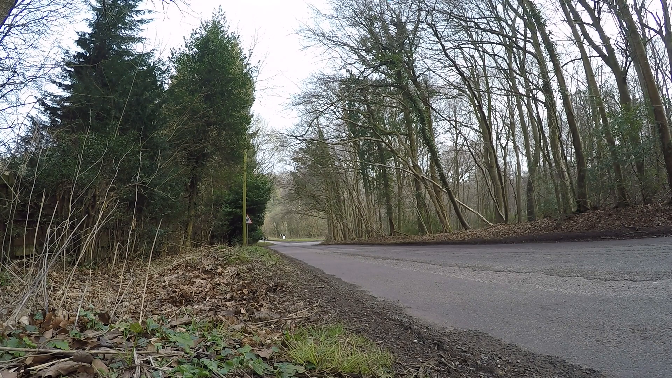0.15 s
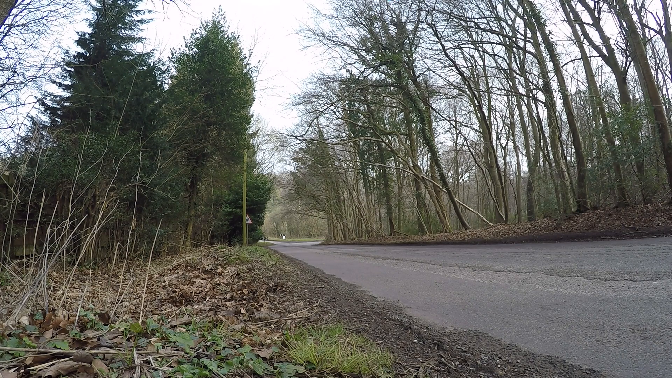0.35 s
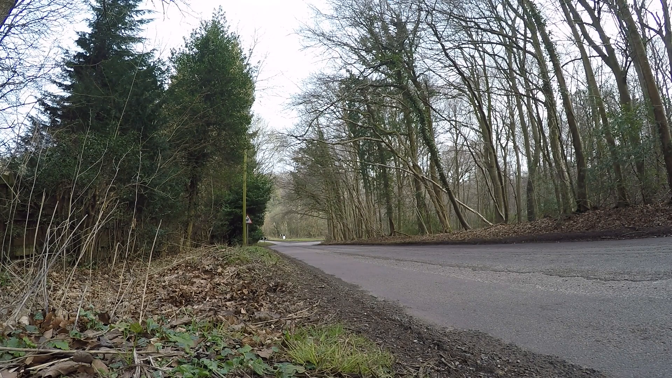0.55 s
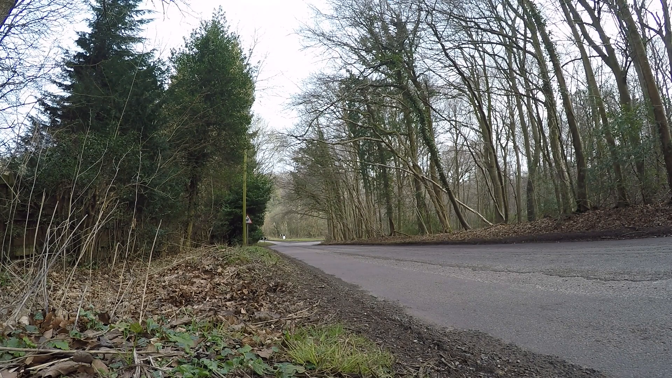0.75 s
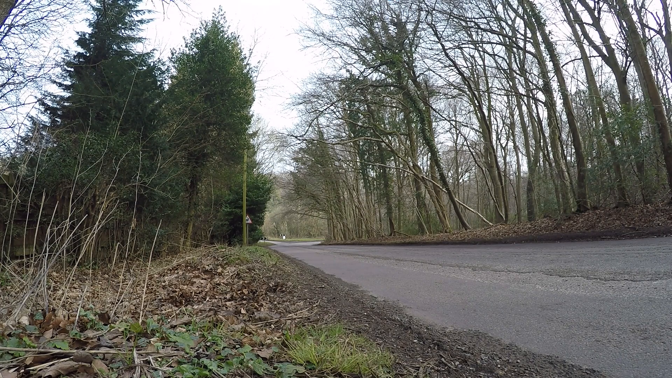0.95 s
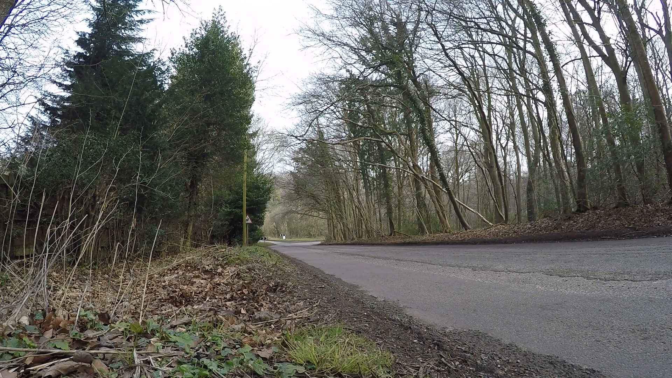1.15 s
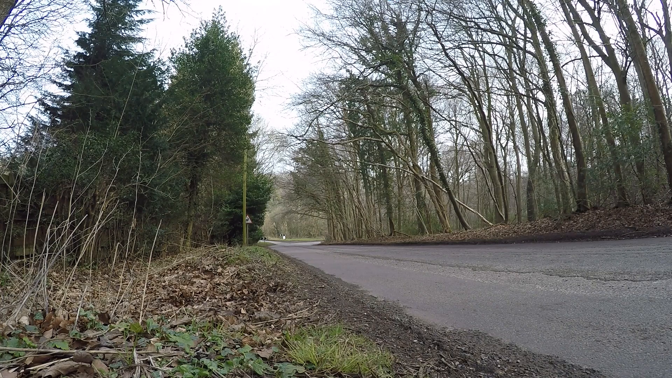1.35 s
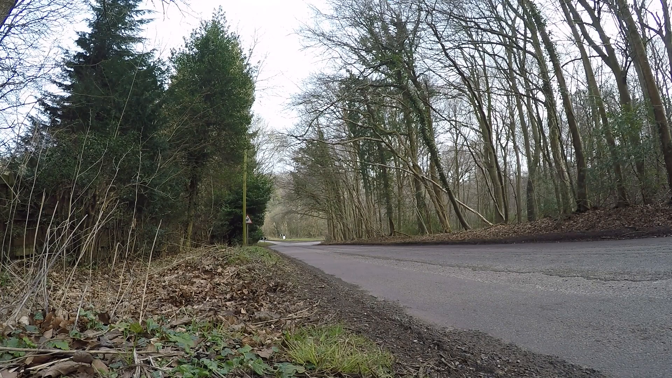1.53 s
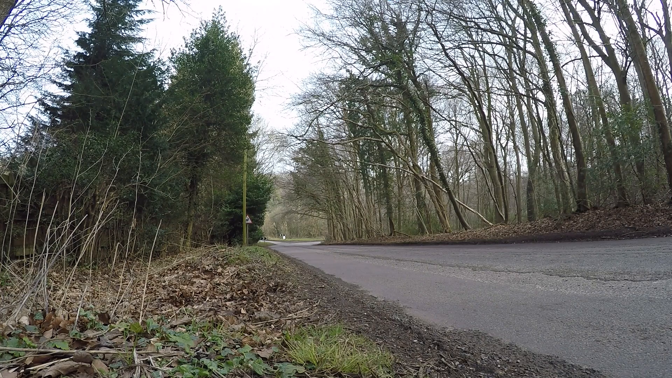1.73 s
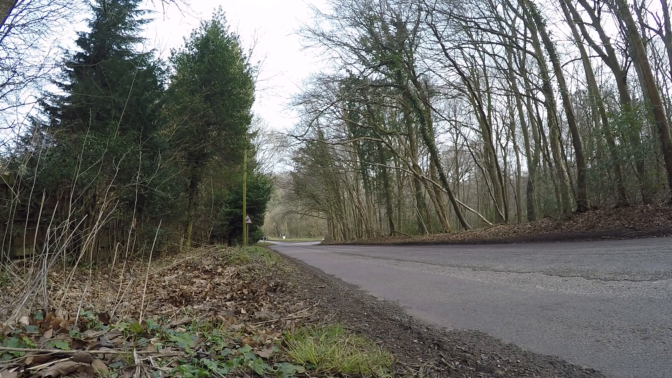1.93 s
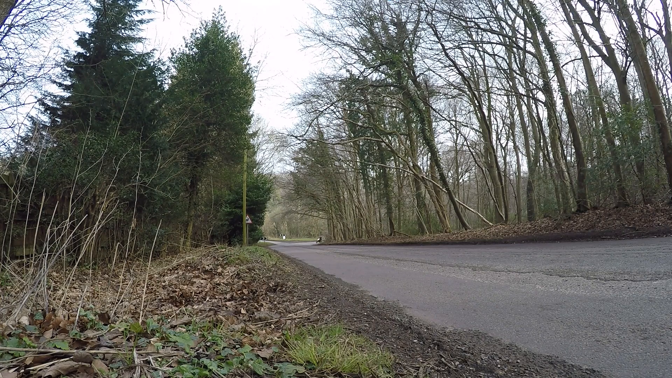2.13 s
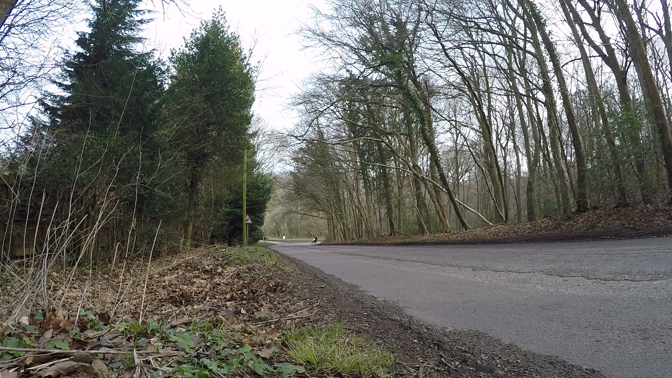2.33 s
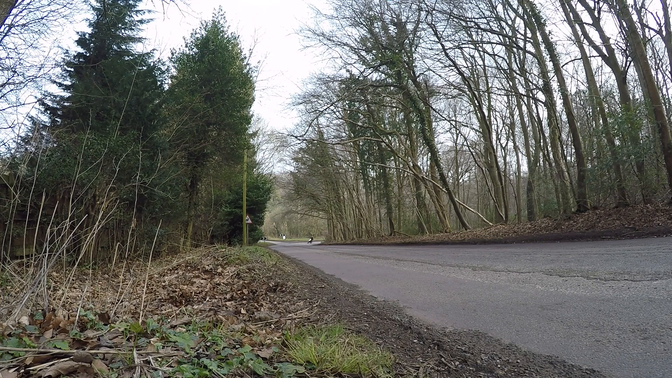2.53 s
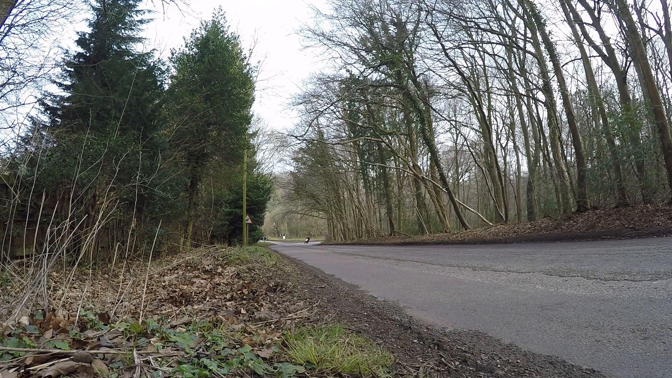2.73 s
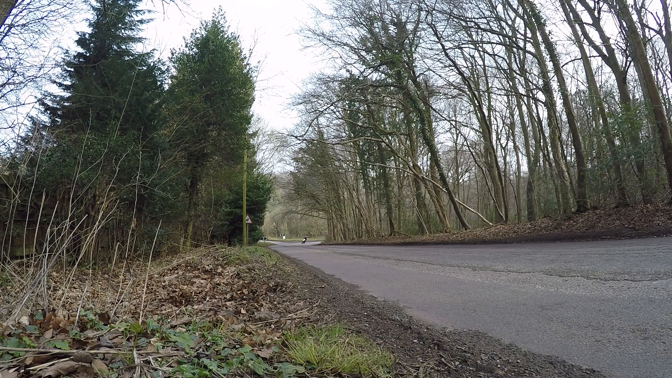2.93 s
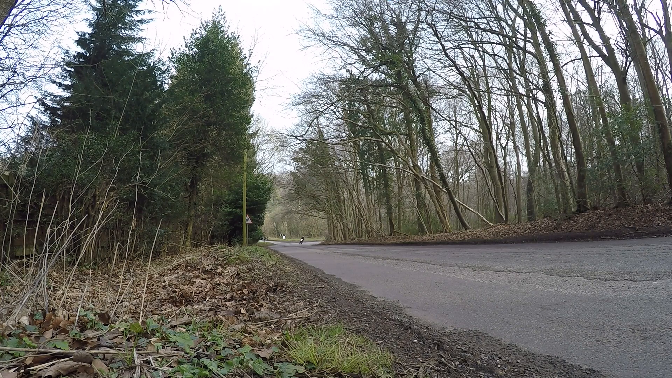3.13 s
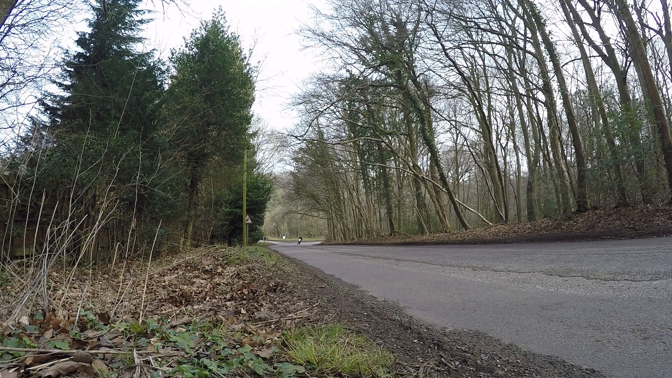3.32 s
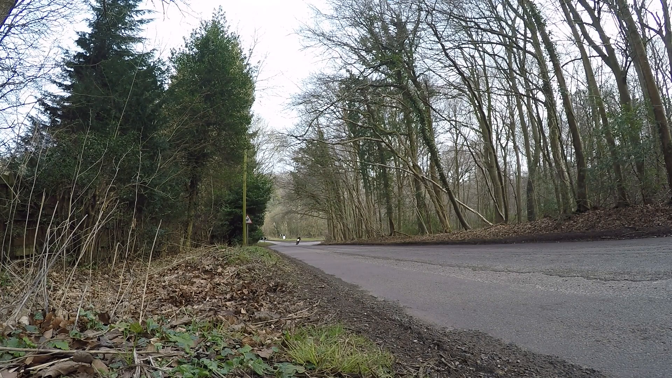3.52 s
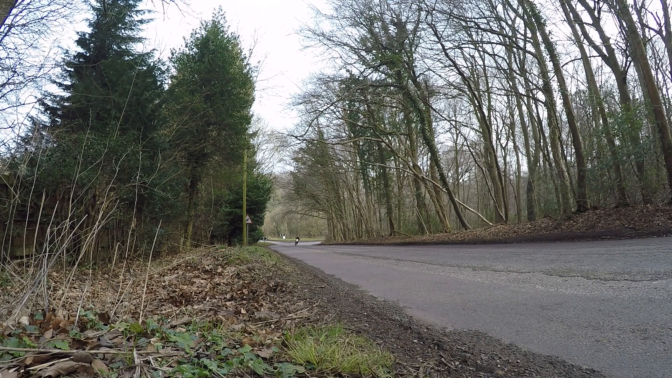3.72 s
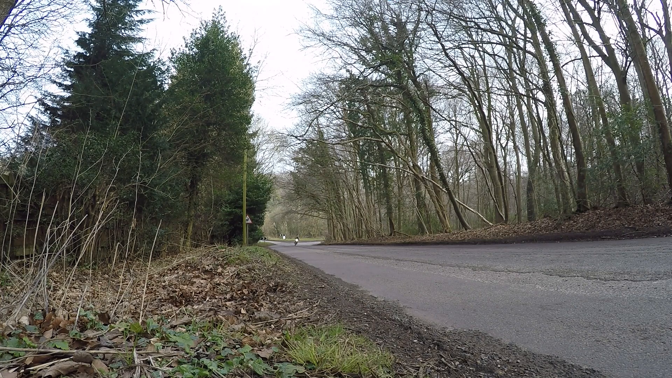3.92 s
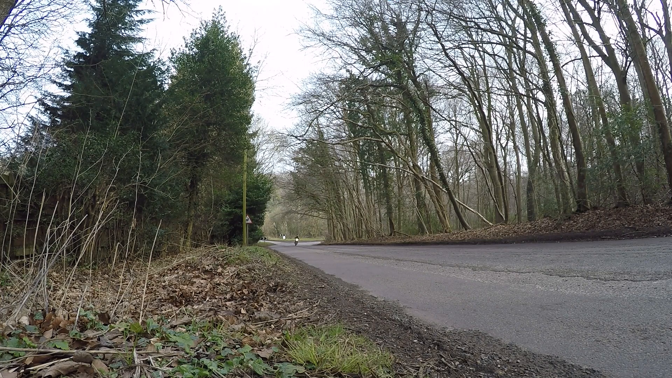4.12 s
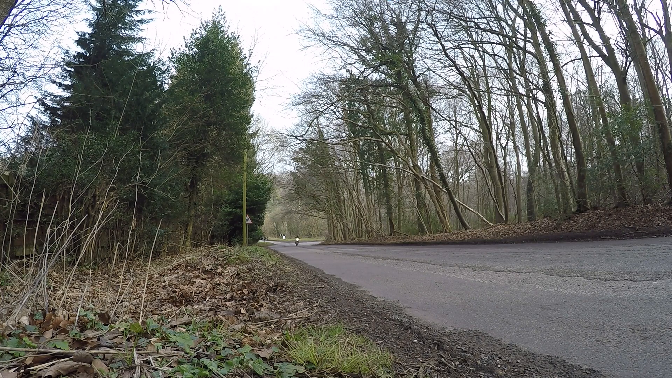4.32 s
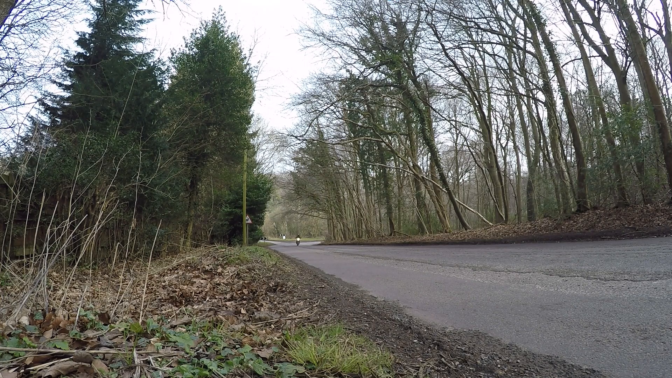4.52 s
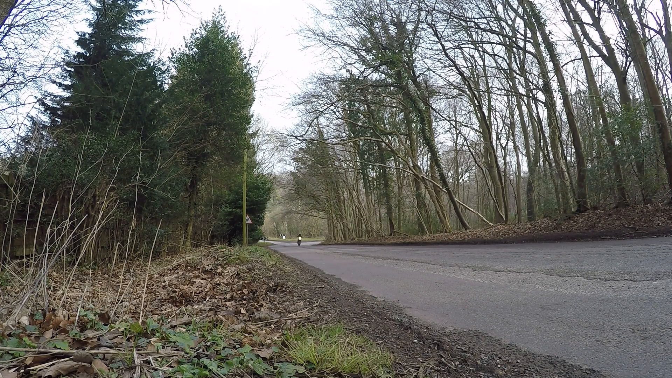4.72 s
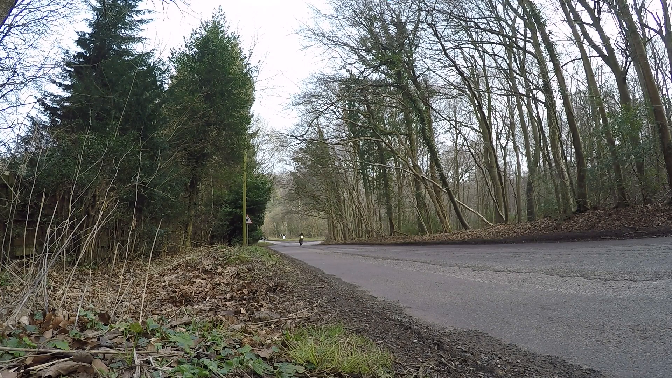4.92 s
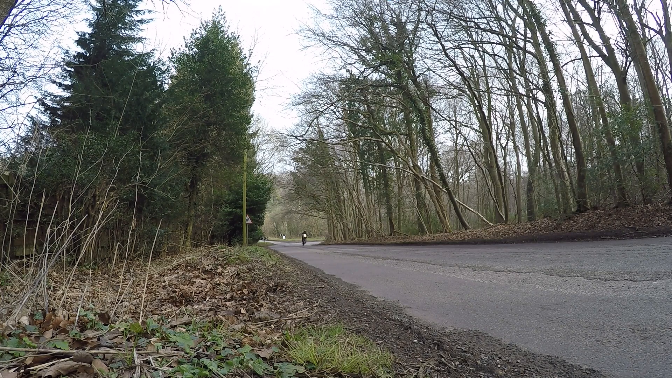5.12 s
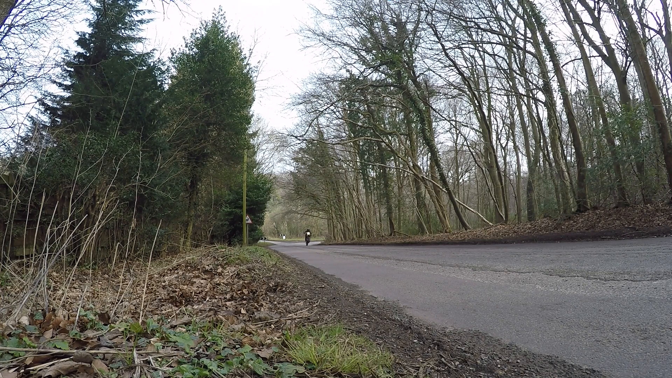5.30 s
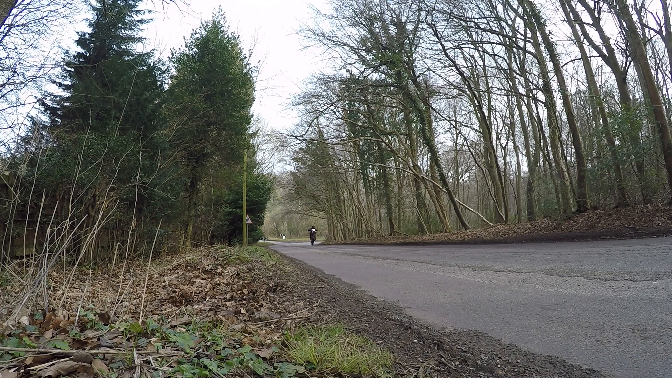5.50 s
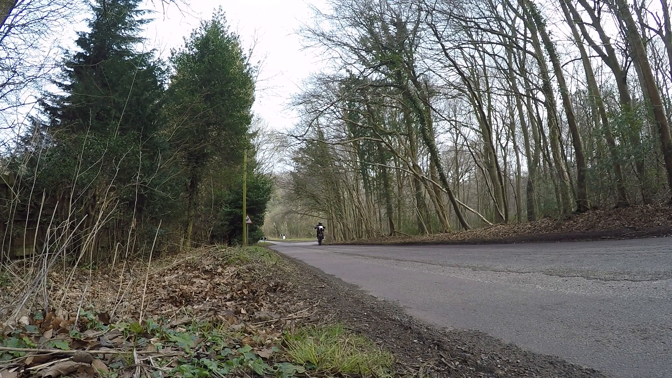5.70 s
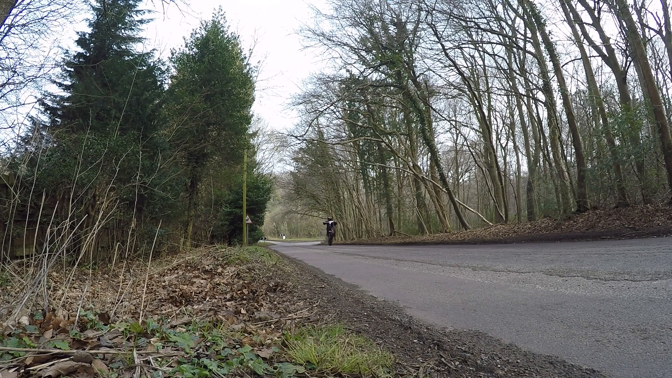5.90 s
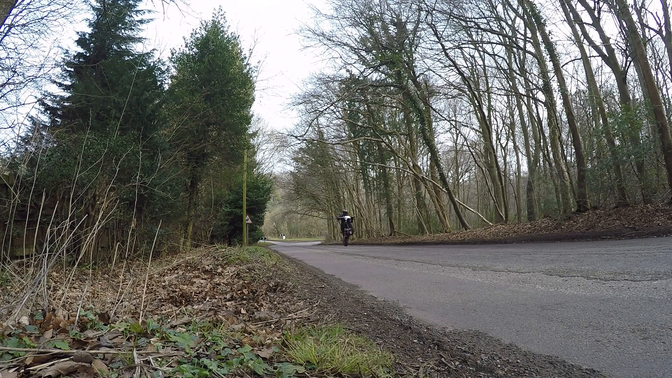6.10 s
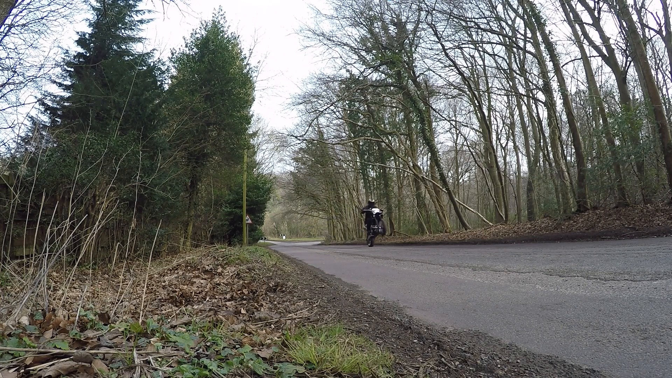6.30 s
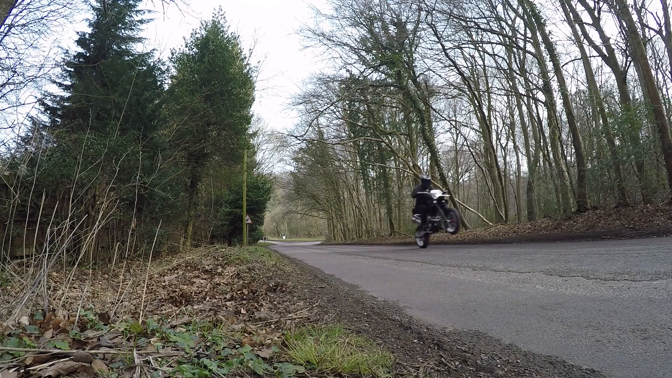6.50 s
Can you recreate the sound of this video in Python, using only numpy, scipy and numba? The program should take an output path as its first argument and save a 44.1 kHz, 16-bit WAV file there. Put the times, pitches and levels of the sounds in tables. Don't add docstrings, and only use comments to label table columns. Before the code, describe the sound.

A quiet wooded roadside with faint air, soft preamp hiss and very weak, buzzing electronic whine. From 0 s a far single-cylinder motorcycle burbles low and dull, slowing and dropping in pitch; a thin brake squeal near 3.5 kHz peaks around 0.9 s and fades by 1.2 s. At about 2.2 s comes a quick throttle blip. From 2.6 s distinct hollow thumps emerge, with one weak misfire near 2.7 s, and the engine pulls harder. By 4 s it is a barking exhaust with gas roar and hiss, rising in pitch as it approaches, echoing off banks and trunks. The throttle eases briefly around 4.6, 5.7 and 6.15 s, each followed by a stronger surge. From 6.2 s the front wheel lifts and close, raspy, crackling firings overload the microphone, ending abruptly at about 6.5 s, still approaching.

```python
import sys
import numpy as np
from scipy import signal
from scipy.fft import rfft, irfft, next_fast_len
from scipy.io import wavfile
from scipy.ndimage import uniform_filter1d, map_coordinates
from numba import njit

SR = 44100
rng = np.random.default_rng(int(sys.argv[2]) if len(sys.argv) > 2 else 0)


def to_wav(s):
    ch = np.atleast_2d(s).T
    pcm = np.round(np.clip(ch, -1, 1) * 32767)
    wavfile.write(sys.argv[1], SR, pcm.astype(np.int16))


def boost(x):
    u = np.asarray(x, float) / 20
    return 10 ** u


N = 288855
TIME = np.arange(N) / SR


def level(x, db):
    return x * boost(db) / np.sqrt(np.mean(x ** 2))


def even(x):
    return x / np.sqrt(uniform_filter1d(x ** 2, SR // 4) + 1e-18)


def curves(table):
    s, *columns = np.transpose(table)
    return [np.interp(TIME, s, c) for c in columns]


def swell(at, rise, hold, fall):
    return np.interp(TIME, at + np.cumsum([0, rise, hold, fall]), [0, 1, 1, 0])


def bump(s, half):
    return np.exp(-((TIME - s) / half) ** 2)


def walk(rate):
    k = int(SR / rate)
    steps = np.repeat(rng.standard_normal(N // k + 1), k)
    return level(uniform_filter1d(uniform_filter1d(steps, k), k)[:N], 0)


@njit
def svf(x, hz, width):
    band, high, b, l = np.empty(len(x)), np.empty(len(x)), 0., 0.
    for i in range(len(x)):
        g, k = np.tan(np.pi * hz[i] / SR), width[i] / hz[i]
        v = (b + g * (x[i] - l)) / (1 + g * (g + k))
        band[i], high[i] = k * v, x[i] - k * v - l - g * v
        b, l = 2 * v - b, l + 2 * g * v
    return band, high


def low_pass(x, hz):
    for _ in range(2):
        x = x - sum(svf(x, hz, 1.93 * hz))
    return x


def resonate(x, modes):
    one = np.ones(N)
    out = 0
    for k, (hz, width, db) in enumerate(modes):
        out = out + (-1) ** k * boost(db) * svf(x, hz * one, width * one)[0]
    return out


def colour(x, points):
    hz, db = np.transpose(points)
    f = np.fft.rfftfreq(N, 1 / SR) + 1
    return irfft(rfft(x) * boost(np.interp(np.log(f), np.log(hz), db)), N)


def woods():
    # frequency in Hz, level in dB per Hz.
    air_spectrum = [(150, -2.5), (260, -6), (400, -14.5), (1400, -17), (2500, -21.5), (3700, -22),
                    (5000, -35.5), (6300, -48), (9000, -69), (13000, -54), (15500, -53)]
    return level(colour(rng.standard_normal(N), air_spectrum), -55.5) * boost(1.0 * walk(1.0))


def camera_whine():
    # frequency in Hz, width in Hz, level in dB, unsteadiness in dB.
    whines = [
        (7100, 600, -76, 3),
        (8360, 60, -73, 1),
        (13600, 800, -79, 1.2),
    ]
    frames = (60 * TIME) % 1 < .45
    out = 0
    for hz, width, db, sway_db in whines:
        tone = level(resonate(rng.standard_normal(N), [(hz, width, 0)]), db)
        out = out + tone * boost(sway_db * walk(4.5))
    return frames * out


def brake_squeal():
    # time in seconds, level in dB.
    squeal_db = [
        (0, -89),
        (.3, -71),
        (.9, -65),
        (1.2, -83),
    ]
    return boost(curves(squeal_db)[0]) * level(resonate(rng.standard_normal(N), [(3570, 70, 0)]), 0)


def controls():
    # time in seconds, firing rate in Hz.
    rate = [(0, 45.2), (.33, 42.26), (.82, 40.98), (1.35, 36.6), (1.7, 35.32), (2.15, 31.88), (2.64, 31.63),
            (3.47, 34.04), (3.78, 37.1), (3.87, 38.77), (4.58, 44.65), (4.74, 50.91), (5.42, 61.83),
            (5.64, 65.35), (5.75, 64.2), (5.93, 68.44), (6.26, 66.35), (6.55, 72)]
    # time in seconds, gas flow in dB, strength of the pressure pulse in dB.
    drive = [(0, -23.5, -32.5), (.42, -32, -42), (1.45, -40, -43.5), (1.9, -38, -28.5), (2.2, -39, -30.5),
             (2.42, -36.5, -28.5), (2.58, -32, -15), (2.85, -29.5, -10.5), (3.4, -21, -5),
             (3.72, -21.5, -6), (3.92, -10, -1.5), (4.07, -7.5, -2.5), (4.21, -9.5, -3.5), (4.36, -4, -3),
             (4.78, -0.5, 0), (5.4, -0.54, 1.5), (5.9, 0.5, 5.5), (6.55, 0.5, 6.5)]
    # time of least gas in seconds, closing in seconds, reopening in seconds, change in dB,
    # lead of the pulses in seconds.
    lifts = [
        (4.64, 0.26, 0.062, -5.5, 0.04),
        (5.67, .14, 0.13, -9, 0.077),
        (6.148, 0.25, 0.1, -14, 0.089),
    ]
    layers = {"boom": (-14, 0.3152, -0.06, 0.5335, -48), "ring": (-24, -0.13, 0.3, 0.34, -70),
              "bark": (-19, 0.1, 0.92, 0.0359, -83), "roar": (-19, 1.2, -0.14, 0.0638, -81.5),
              "rasp": (-20, .5, 0.27, .5, -74), "hiss": (-21.5, 0.43, 0, 1.15, -82),
              "sizzle": (-29, 0.8, 0.38, 1.19, -70)}
    shadows = {"ring": (1.67, 0.17, -10.5), "rasp": (2.75, .12, -7)}
    # time in seconds, half length in seconds, change in dB.
    ring_fades = [
        (3.0, .3, 4),
        (3.6, .2, -5),
        (4.3, 0.13, -13),
    ]
    # time in seconds, level in dB.
    aim = [(2.3, -1.5), (3.7, -9), (4.2, 7), (4.35, 8), (4.6, -4), (4.7, -1), (6.0, -5), (6.25, -6),
           (6.46, 2.5)]

    def lift_db(early):
        return sum(db * swell(s - early * lead - shut, shut, 0, reopen) for s, shut, reopen, db, lead in lifts)

    blip_s = 2.16
    blip = swell(blip_s, 0.107, .08, 0.234)
    gas_db, pulse_db = curves(drive)
    gas_db = gas_db + lift_db(0) + 8 * blip
    pulse_db = pulse_db + 0.97 * lift_db(0.72) + 13.5 * swell(blip_s, 0.045, 0.022, 0.07)
    pulse_db = pulse_db - 17 * bump(2.735, 0.023)

    speed_m_s, passes_s, verge_m = 21.2, 7.008, 4.4
    distance_m = np.hypot(speed_m_s * (passes_s - TIME), verge_m)
    near_db = -20 * np.log10(distance_m / 10)
    gain = {}
    for name, (db, gas_share, pulse_share, near_share, least_db) in layers.items():
        follow_db = db + gas_share * gas_db + pulse_share * pulse_db + near_share * near_db
        gain[name] = np.hypot(boost(follow_db), boost(least_db))

    gain["boom"] = gain["boom"] * boost(2 * blip)
    for name, (s, clearing, db) in shadows.items():
        gain[name] = gain[name] * boost(db * np.clip((s + clearing - TIME) / clearing, 0, 1))
    gain["ring"] = gain["ring"] * boost(sum(db * bump(s, half) for s, half, db in ring_fades))
    for name, share in dict(hiss=0.53, sizzle=0.94).items():
        gain[name] = gain[name] * boost(share * curves(aim)[0])
    wheelie = np.clip((TIME - 6.13) / .05, 0, 1)
    gain["rasp"] = gain["rasp"] * boost(2.5 * wheelie)
    gain["roar"] = gain["roar"] * boost(-1 * wheelie)
    return curves(rate)[0] + 9.68 * blip, gain


def crank(hz):
    beats_s = [2.2103, 2.605, 2.7662, 3.162, 3.429, 3.684, 3.872, 4.048, 4.263, 4.488, 4.704, 6.147, 6.343,
               6.516]
    turns = np.cumsum(hz) / SR
    at_beats = np.interp(beats_s, TIME, turns)
    return turns - np.interp(TIME, beats_s, np.unwrap(at_beats % 1, period=1))


def firings(turns, late_s, size_db):
    at = np.flatnonzero(np.diff(np.floor(turns)) > 0)
    chance = rng.standard_normal((len(at), 2)).T
    pulses = np.zeros(N)
    at = np.clip(at + (late_s * SR * chance[0]).astype(int), 0, N - 1)
    pulses[at] = boost(size_db * chance[1])
    return pulses


def orders(turns, hz):
    orders_db = [-6, -0.14, -3, -5, -9.5]
    order_turns = [.48, .12, .78, .72, .66]
    # frequency in Hz, level in dB.
    header = [(35, 5), (60, 1.5), (85, 2), (108, -3.5), (128, 0), (155, 0.5), (200, -3.5), (270, 4.5)]
    # time in seconds, half length in seconds, change in dB.
    fades = [
        [(.6, .45, 4.5), (1.7, .3, -3), (3.5, .3, -4), (5.7, 0.46, -5), (6.1, 0.085, 7)],
        [(.8, 0.13, -0.5), (1.05, 0.096, -4), (2.9, 0.57, -7), (6.2, 0.11, 4.5), (6.46, 0.086, -20)],
        [(.4, 0.4, 7.5), (2.0, .3, -5), (4.5, 0.11, -14), (5.62, 0.063, -12), (6.05, 0.1, -18),
         (6.35, 0.092, 6)],
        [(.3, 0.3, -13), (.85, 0.12, -2), (1.8, 0.26, 6.5), (3.2, 0.24, 4), (4.4, 0.17, -19),
         (5.65, 0.095, -32)],
        [(.8, 1.0, -14), (3.1, .3, 11), (3.9, 0.52, -5), (5.1, 0.42, 0), (6.4, 0.16, 6.5)],
    ]
    header_hz, header_db = np.transpose(header)
    out = 0
    for k, db in enumerate(orders_db):
        order_hz = (k + 1) * hz
        db = db + np.interp(np.log(order_hz), np.log(header_hz), header_db) + 1.0 * walk(8.1)
        db = db + sum(fade_db * bump(s, half) for s, half, fade_db in fades[k])
        phase = 2 * np.pi * ((k + 1) * turns + order_turns[k])
        out = out + np.sqrt(2) * boost(db) * np.sin(phase)
    return out


def exhaust_boom(turns, hz, gain):
    # lag in seconds, level in dB.
    far_wall = [
        (.11, -10.5),
        (.29, -3),
    ]
    # time in seconds, share from 0 to 1.
    wall_share = [(0, .05), (4.3, .1), (5.3, .9), (6.55, .9)]
    boom = gain * orders(turns, hz)
    echo = 0
    for lag, db in far_wall:
        echo = echo + boost(db) * map_coordinates(boom, [(TIME - lag) * SR], order=1, mode="mirror")
    return boom + curves(wall_share)[0] * echo


def rumble(gain):
    return gain * boost(-7) * level(resonate(rng.standard_normal(N), [(43.6, 107, -1.5), (117, 49, 11)]), 0)


def over_ground(x, lag_cycles=.3):
    size = next_fast_len(N + SR)
    f = np.fft.rfftfreq(size, 1 / SR) + 30
    return irfft(rfft(x, size) * np.exp(-2j * np.pi * lag_cycles * np.log(f / 2000)), size)[:N]


def smeared_clicks(pulses, hz):
    clicks = svf(over_ground(pulses), 4.2 * hz, 5.0 * hz)[1]
    return svf(clicks[::-1].copy(), 4.2 * hz[::-1], 5.0 * hz[::-1])[1][::-1].copy()


def silencer_ring(clicks, hz, gain):
    # frequency in Hz, width in Hz, level in dB.
    chamber = [
        (162, 51, 4.5),
        (201.6, 38, -1.5),
    ]
    ring = gain * even(resonate(resonate(clicks, chamber), [(188, 150, 0)]))
    return ring * np.clip((51 - hz) / 6, .1, 1)


def banks(x):
    # lag far in ms, lag near in ms, level in dB.
    bank_echoes = [
        (3.64, 4.27, -7),
        (8.14, 6.34, -4.5),
        (13.79, 21.0, -12.5),
        (33.33, 27.0, -0.5),
    ]
    near = (TIME / TIME[-1]) ** 2
    out = x
    for far, close, db in bank_echoes:
        lag_ms = far + (close - far) * near + .5 * walk(4)
        out = out + boost(db) * near ** 0.74 * np.interp(TIME - lag_ms / 1000, TIME, x)
    return out


def pipe_bark(clicks, hz, gain):
    # frequency in Hz, width in Hz, level in dB.
    tail_pipe = [
        (294, 61, 6.5),
        (588, 700, 9),
        (900, 100, -29),
    ]
    # time in seconds, frequency in Hz.
    bark_top = [(0, 323), (2.2, 465), (2.8, 610), (3.8, 900), (6.55, 1010)]
    # time in seconds, frequency in Hz.
    ground_band = [(0, 263), (2.1, 290), (2.5, 335), (3.0, 335), (3.4, 312), (3.9, 330), (4.6, 440),
                   (5.7, 410), (6.55, 350)]
    ground_hz = curves(ground_band)[0]
    pipe = low_pass(resonate(clicks, tail_pipe), curves(bark_top)[0])
    pipe = banks(.7 * pipe + .7 * svf(pipe, ground_hz, .28 * ground_hz)[0])
    pipe = pipe - np.clip((50 - hz) / 8, .2, .85) * resonate(pipe, [(228, 30, 0)])
    return gain * even(pipe)


def gas_roar(shape, shock, air_hz):
    # frequency in Hz, width in Hz, level in dB.
    roar_modes = [
        (804, 324, -4.5),
        (1800, 1154, -1),
        (2870, 1950, -5),
    ]
    turbulence = shape ** .7 * rng.standard_normal(N) * boost(.6 * walk(14))
    return low_pass(resonate(.35 * shock + turbulence, roar_modes), air_hz)


def end_cap_rasp(shape, shock, gated):
    # frequency in Hz, width in Hz, level in dB.
    end_cap = [
        (1130, 90, 0),
        (1420, 330, 2),
    ]
    knock = .5 * rng.standard_normal(N)
    return resonate(resonate(1.5 * gated * shock + shape * knock, end_cap), [(1350, 900, 0)])


def jet_treble(shape, air_hz):
    # frequency in Hz, level in dB per Hz.
    hiss_spectrum = [(2000, -23), (3500, -9), (4300, -10), (6000, -18.5), (8000, -25), (11000, -56),
                     (15000, -69)]
    # frequency in Hz, level in dB per Hz.
    sizzle_spectrum = [(5000, -12), (7500, -7.5), (10000, -6.5), (13000, -6), (15500, -7)]
    crackle = shape ** .75 * rng.standard_normal(N) * boost(1.0 * rng.exponential(size=N))
    return colour(crackle, hiss_spectrum), low_pass(colour(crackle, sizzle_spectrum), air_hz)


def gas(turns, gain, pulses):
    # time in seconds, share from 0 to 1.
    puffed_share = [(0, .05), (2.8, .06), (3.8, .15), (4.75, .2), (5.1, .08), (6.05, .1), (6.2, .55),
                    (6.55, .75)]
    # time in seconds, frequency in Hz.
    air_top = [(0, 7000), (3.8, 7500), (4.6, 9000), (4.72, 11400), (6.1, 14000), (6.55, 17000)]
    gated, air_hz = curves(puffed_share)[0], curves(air_top)[0]
    angle = turns % 1
    puff = level(angle * np.exp(-angle / .1), 0)
    shape = np.sqrt(1 - gated) + np.sqrt(gated) * puff
    shock = -np.sqrt(gated) * even(pulses)
    roar = gas_roar(shape, shock, air_hz)
    rasp = end_cap_rasp(shape, shock, gated)
    hiss, sizzle = jet_treble(shape, air_hz)
    parts = dict(roar=roar, rasp=rasp, hiss=hiss, sizzle=sizzle)
    return sum(gain[name] * level(x, 0) for name, x in parts.items())


@njit
def trunks(x, lags, gain, damp):
    line, soft, out = np.zeros((8, 8192)), np.zeros(8), np.zeros((2, len(x)))
    for i in range(len(x)):
        total = 0.
        for k in range(8):
            soft[k] += (1 - damp) * (gain[k] * line[k, (i - lags[k]) & 8191] - soft[k])
            total += soft[k]
            out[k % 2, i] += soft[k]
        for k in range(8):
            line[k, i & 8191] = x[i] + soft[k] - total / 4
    return out


def tree_echo(exhaust, puffs):
    # time in seconds, level in dB.
    trees = [(0, 5), (2.3, -4.5), (2.8, -8.5), (3.7, -10), (4.2, -2), (6.55, -7)]
    lags = rng.integers(900, 5000, 8)
    t60_s, damp = 0.97, 0.045
    sent = exhaust * boost(curves(trees)[0]) + boost(-12) * puffs
    return boost(1.0) * trunks(sent, lags, boost(-60 * lags / SR / t60_s), damp)


def microphones(mid, echo):
    # frequency in Hz, level in dB.
    ports = [(40, -39), (150, -21.5), (500, -25), (1300, -32.5), (2500, -33), (4400, -38), (8000, -30),
             (13000, -13.5)]
    # time in seconds, extra side in dB.
    off_axis = [(0, -4.5), (4, -7.5), (6.1, 1.5), (6.55, 6.5)]
    late = np.pad(mid, (400, 0), "reflect")[:N]
    side = boost(curves(off_axis)[0]) * colour(late + .5 * (echo[0] - echo[1]), ports)
    return np.array([mid + side, mid - side])


def scene():
    quiet = woods() + camera_whine() + brake_squeal()
    hz, gain = controls()
    turns = crank(hz)
    pulses = firings(turns, late_s=.00015, size_db=1.0)
    clicks = smeared_clicks(pulses, hz)
    boom = exhaust_boom(turns, hz, gain["boom"])
    ring = silencer_ring(clicks, hz, gain["ring"])
    bark = pipe_bark(clicks, hz, gain["bark"])
    puffs = gas(turns, gain, pulses)
    echo = tree_echo(ring + bark + 0.23 * boom, puffs)
    direct = boom + rumble(gain["boom"]) + ring + bark + puffs
    return microphones(direct + quiet + echo.mean(axis=0), echo)


def roll_off(x):
    return signal.sosfilt(signal.butter(12, 15690, fs=SR, output="sos"), x)


def record(dry):
    x = signal.sosfilt(signal.butter(2, 28, "high", fs=SR, output="sos"), dry)
    x = signal.sosfilt(signal.ellip(8, .2, 70, 15900, fs=SR, output="sos"), x)
    return roll_off(np.clip(x, -1, 1))


dry = scene()
out = record(dry)
to_wav(out)
```